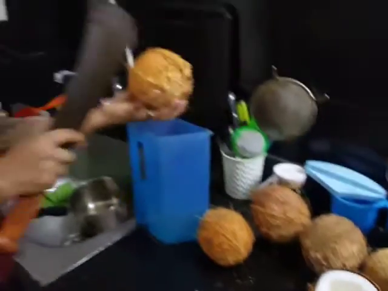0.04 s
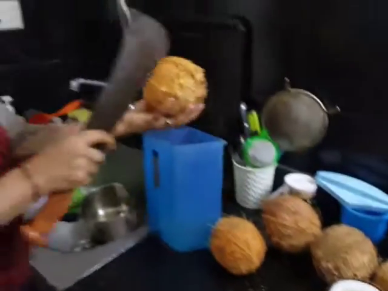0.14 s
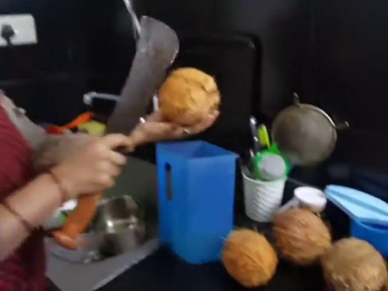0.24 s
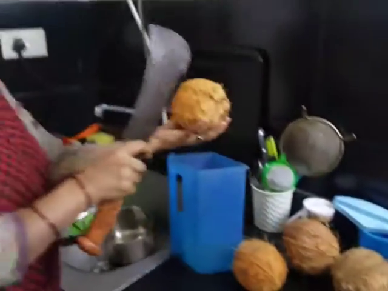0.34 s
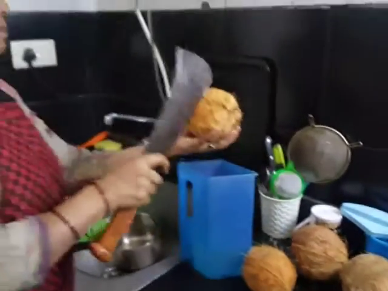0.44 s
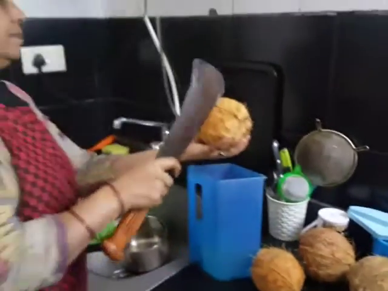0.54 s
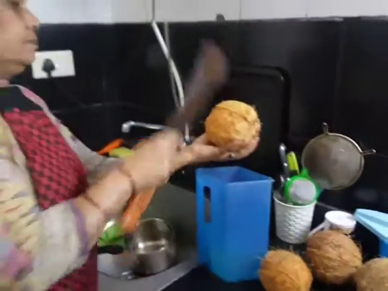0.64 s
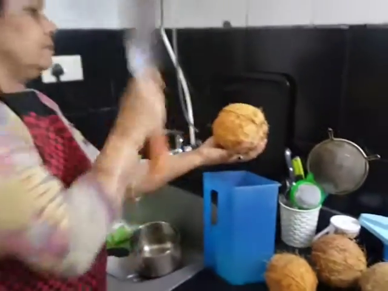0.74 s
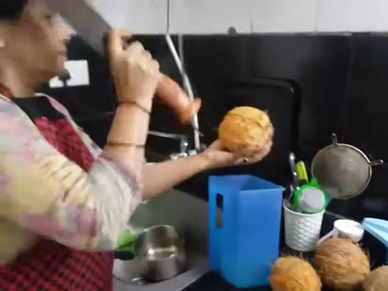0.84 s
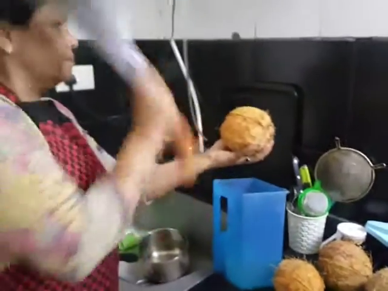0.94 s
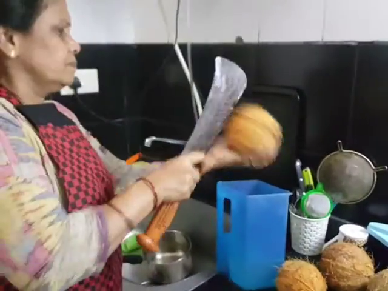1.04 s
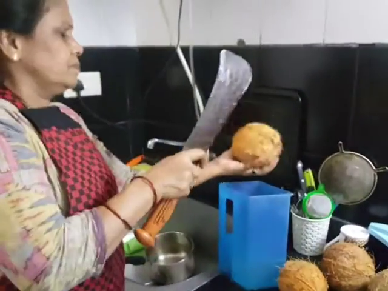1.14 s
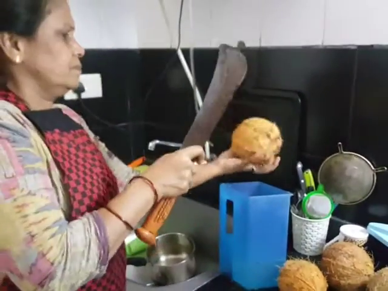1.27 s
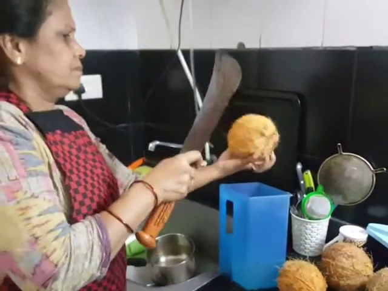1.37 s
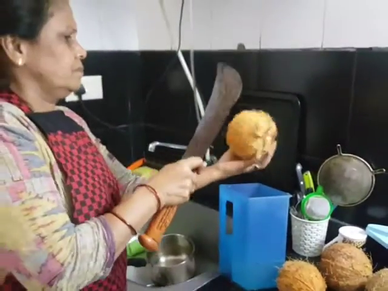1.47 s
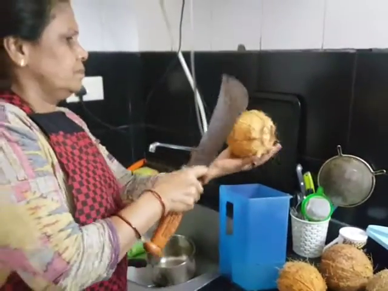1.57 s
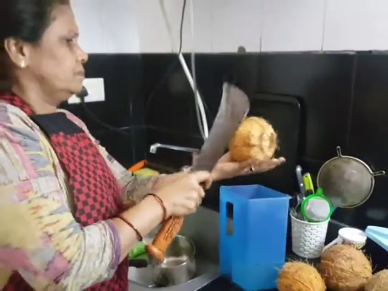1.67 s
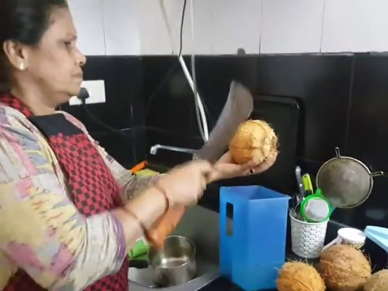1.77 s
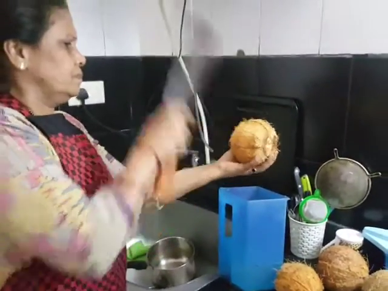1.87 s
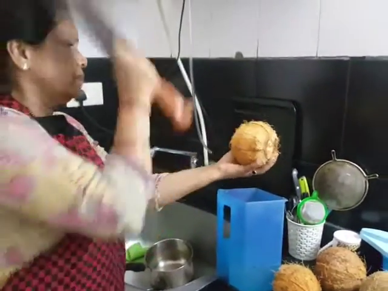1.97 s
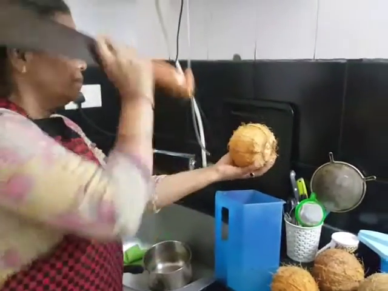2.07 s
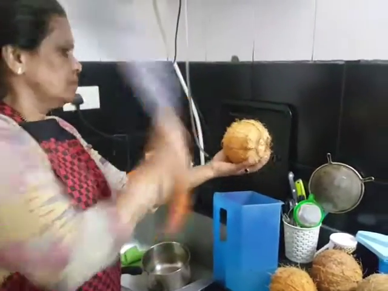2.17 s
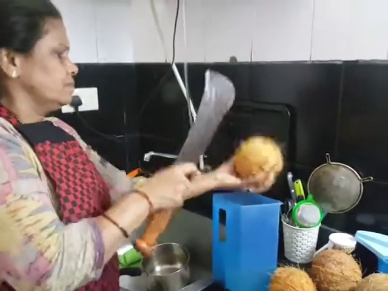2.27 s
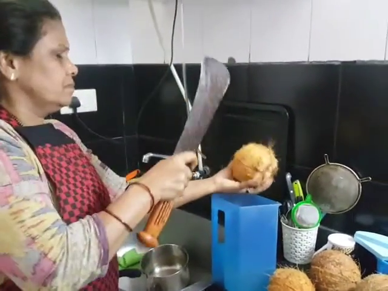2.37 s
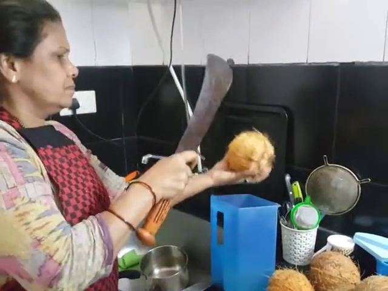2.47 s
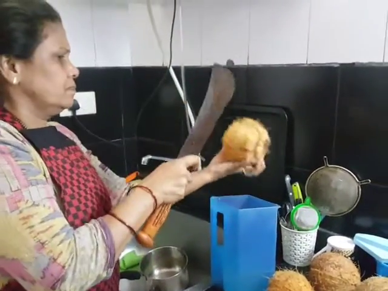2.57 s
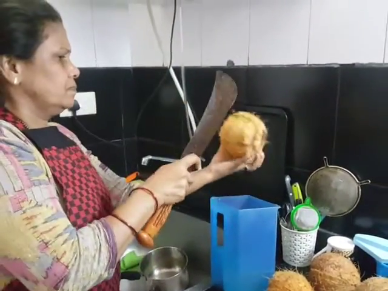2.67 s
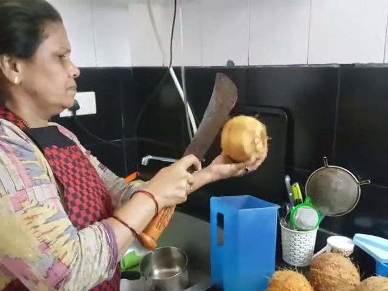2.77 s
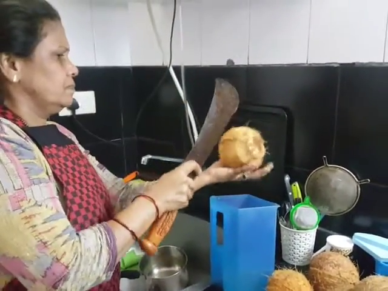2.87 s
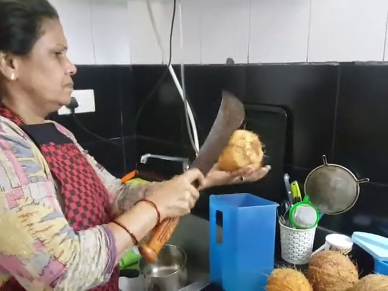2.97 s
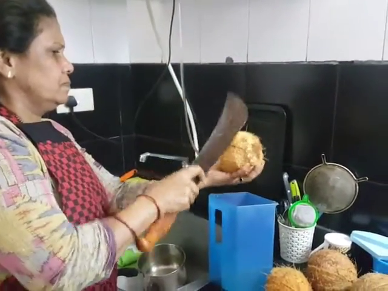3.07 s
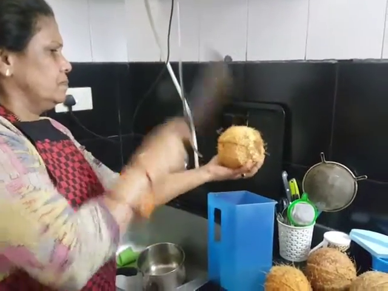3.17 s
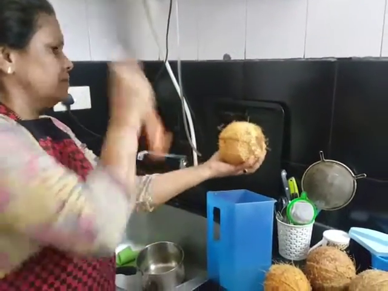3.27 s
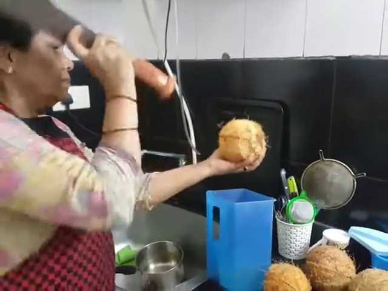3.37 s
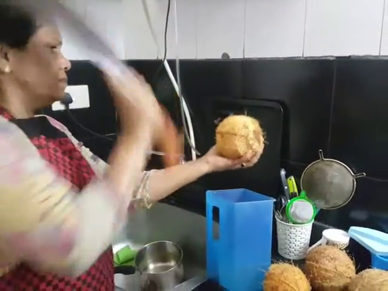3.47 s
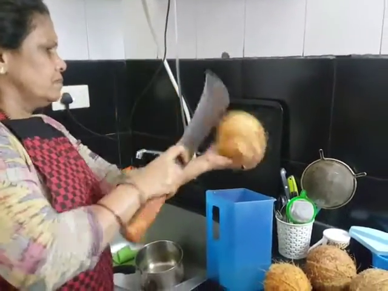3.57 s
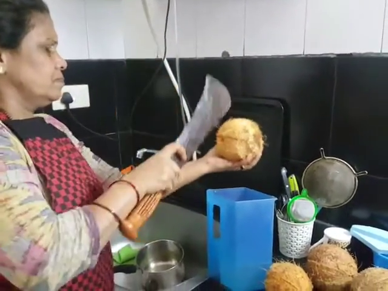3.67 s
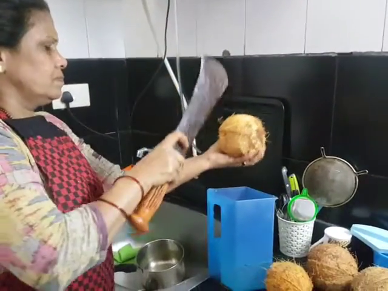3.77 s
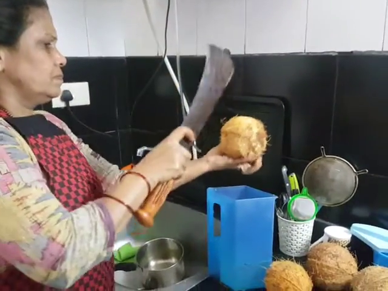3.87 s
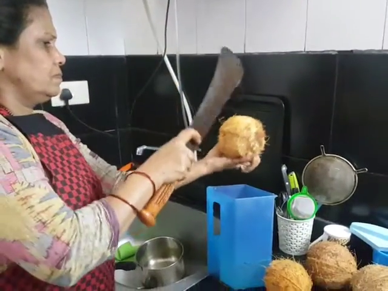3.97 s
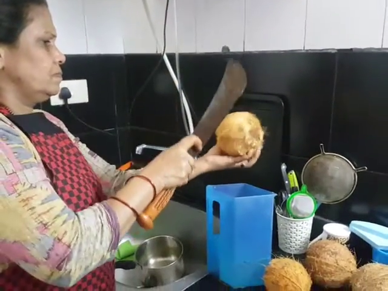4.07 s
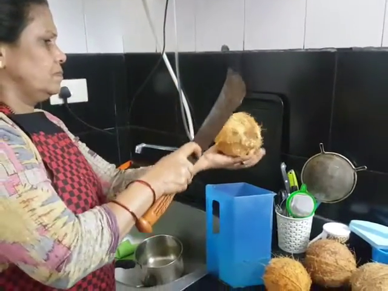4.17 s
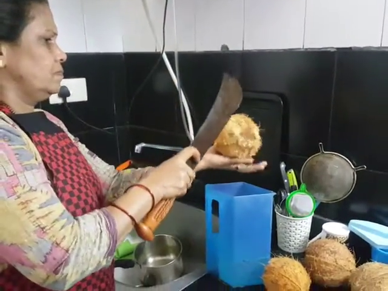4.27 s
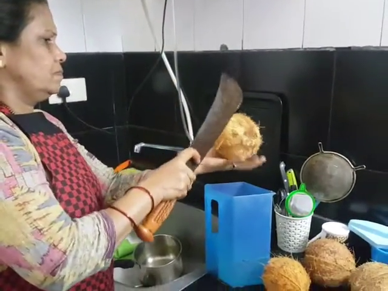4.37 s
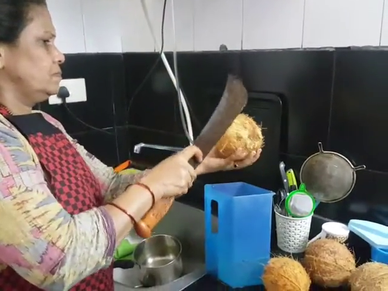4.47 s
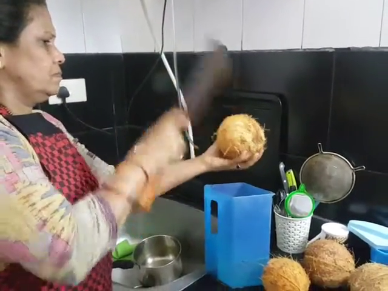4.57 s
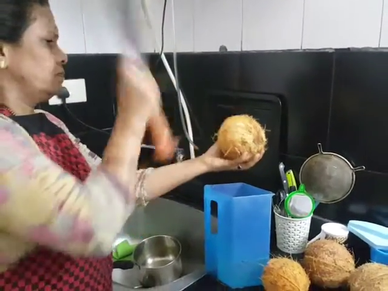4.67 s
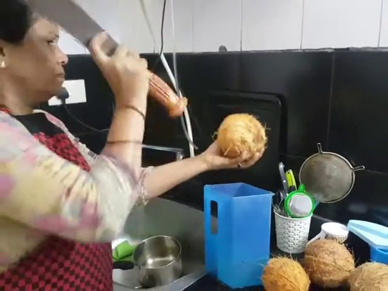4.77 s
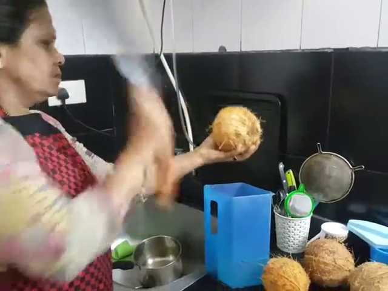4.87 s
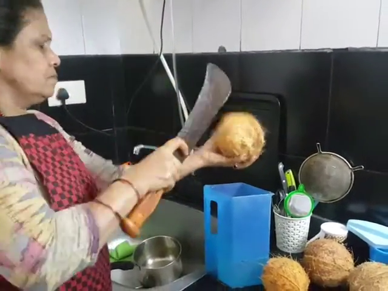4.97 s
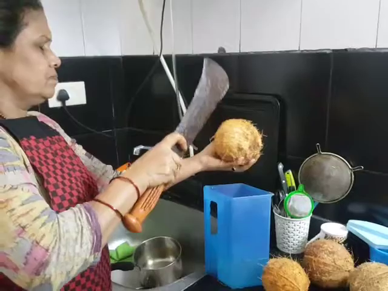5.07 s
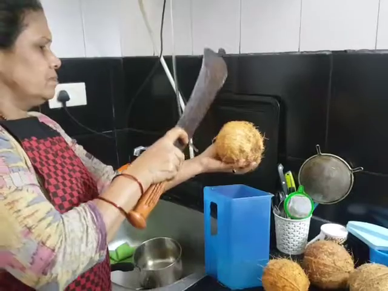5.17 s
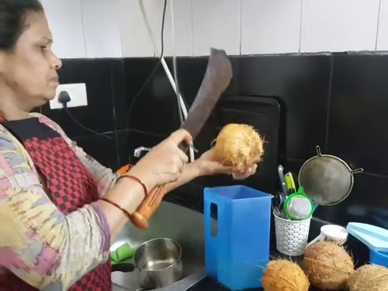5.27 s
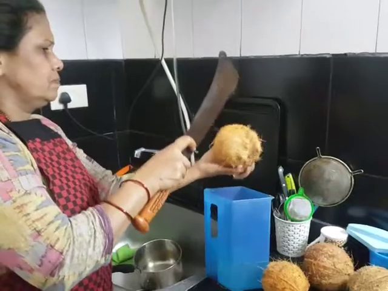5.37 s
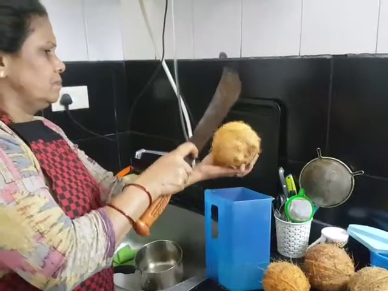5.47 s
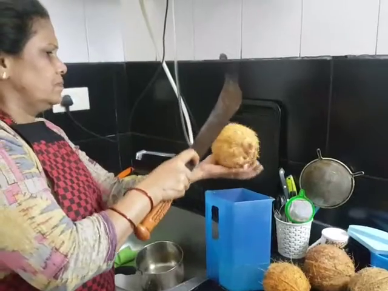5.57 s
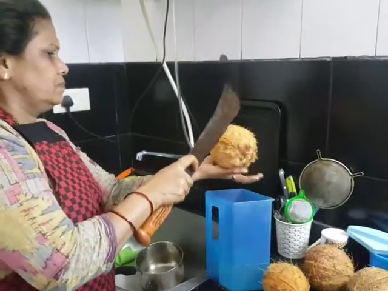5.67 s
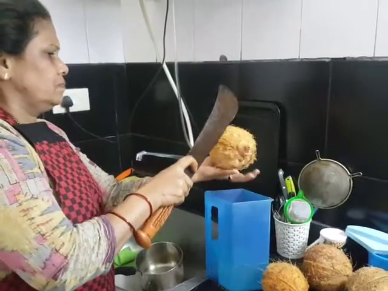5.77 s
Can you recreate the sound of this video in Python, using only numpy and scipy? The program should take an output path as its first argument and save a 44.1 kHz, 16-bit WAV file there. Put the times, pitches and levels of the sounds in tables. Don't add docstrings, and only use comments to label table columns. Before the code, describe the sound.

Four sharp, woody blows of a big knife on a coconut echo off hard kitchen walls, with softer taps between and faint street noise behind.

```python
import sys
import numpy as np
from scipy import signal
from scipy.io import wavfile
from scipy.ndimage import uniform_filter1d

SR = 44100
rng = np.random.default_rng(int(sys.argv[2]) if len(sys.argv) > 2 else 0)


def gain_from_db(level_db):
    decades = np.asarray(level_db, float) / 20
    return 10 ** decades


def to_wav(s):
    ch = np.atleast_2d(s).T
    pcm = np.round(np.clip(ch, -1, 1) * 32767)
    wavfile.write(sys.argv[1], SR, pcm.astype(np.int16))


N = 257544


def evened(x):
    return x / np.sqrt(np.mean(x ** 2) + 1e-20)


def unit(x):
    return x / np.linalg.norm(x)


def read(points, hz):
    f, value = np.transpose(points)
    return np.interp(np.log(hz + 1), np.log(f + 1), value)


def add(mix, s, sound):
    part = mix[:, round(s * SR):][:, :sound.shape[-1]]
    part += sound[..., :part.shape[-1]]


# (frequency [Hz], likeness [-1 to 1])
LIKENESS = [(60, 0.97), (200, 0.89), (380, 0.63), (640, 0.78), (1200, 0), (15000, 0.085)]
# (frequency [Hz], left minus right [dB])
BALANCE = [(60, -1.5), (180, 0), (550, 0.5), (1650, -0.5), (4970, -1.5), (15000, 2.5)]


def stereo_noise(size, shape_db, hop=64):
    frames = size // hop + 5
    hz = np.fft.rfftfreq(4 * hop, 1 / SR)[:, None]
    a, b, c, d = rng.standard_normal((frames, len(hz), 4)).T
    same = np.clip(read(LIKENESS, hz), -1, 1)
    left = a + 1j * b
    right = same * left + np.sqrt(1 - same ** 2) * (c + 1j * d)
    balance_db = read(BALANCE, hz) * np.array([.5, -.5])[:, None, None]
    gain_db = shape_db(hz, np.arange(frames) * hop / SR) + balance_db
    spectra = np.array([left, right]) * gain_from_db(gain_db)
    return signal.istft(spectra, nperseg=4 * hop, noverlap=3 * hop)[1][:, :size]


DUCK_DB = [2, 2, 8.3, 9]


def ducking():
    hold_s, release_s = 0.6, 0.56
    t, down = np.arange(N) / SR, 0
    for blow, depth_db in zip(BLOWS, DUCK_DB):
        hold = np.clip(1 - (t - blow[0] - hold_s) / release_s, 0, 1) * (t > blow[0])
        down = np.maximum(down, depth_db * hold)
    return uniform_filter1d(down, 400)


# (frequency [Hz], level [dB per Hz])
WASH = [(20, -10.5), (70, 4.5), (130, -1), (230, -2.5), (500, -10), (1000, -15), (2000, -16), (4000, -22.5),
        (6500, -30), (9500, -32), (10300, -42.5), (14500, -37.5), (15000, -42.5), (15400, -50),
        (15800, -71.5)]
# (time [s], level over calm [dB])
BUSY = [(0, 15), (.2, 11), (.47, 6.5), (.75, 9), (1.05, 7.5), (1.9, 0.5), (2.2, -0.5), (2.95, 5), (3.3, 2),
        (3.6, 0.5), (4.4, -1.5), (4.8, -2), (5.0, -5), (5.84, -6.5)]
# (calm level [dB], share of bustle [ratio], share of ducking [ratio], share of a car [dB])
WASH_LAYERS = [
    (-65.5, .6, 1, -6.5),
    (-61, 0.96, 0.89, -28.5),
    (-61, 0.21, 0.25, 1),
]
# (time [s], length [s], level [dB])
CARS = [
    (0.038, 0.12, -54.5),
    (0.814, 0.1, -61.5),
    (2.3, 0.057, -61.5),
    (3.305, 0.13, -68),
    (4.676, 0.41, -59),
    (4.932, 0.052, -55.5),
]


def wash():
    t = np.arange(N) / SR
    busy_db, down_db = np.interp(t, *np.transpose(BUSY)), ducking()
    cars = sum(gain_from_db(db) ** 2 * np.exp(-((t - s) / length) ** 2) for s, length, db in CARS)
    ranges = [[(130, -5), (220, -27.0)],
              [(110, -30.5), (180, -7.0), (1000, -7.0), (1700, -20.0)],
              [(600, -15.0), (1100, -2.5)]]
    mix = 0
    for (calm_db, busy_share, duck_share, car_db), part in zip(WASH_LAYERS, ranges):
        grain = rng.standard_normal((513, N // 256 + 5))
        patches = evened(uniform_filter1d(uniform_filter1d(grain, 8, 0), 12, 1))
        layer = stereo_noise(N, lambda hz, s: read(WASH, hz) + read(part, hz) + 0.24 * patches, hop=256)
        level = np.sqrt(gain_from_db(calm_db + busy_share * busy_db) ** 2 + gain_from_db(car_db) ** 2 * cars)
        mix = mix + evened(layer) * level * gain_from_db(-duck_share * down_db)
    return mix


# (start [s], end [s], frequency [Hz], width [Hz], level [dB])
FAR_TONES = [(0, .17, 1850, 240, -52.5), (0.117, 0.177, 74.5, 20, -46.5), (0.163, 0.246, 65, 20, -43.5),
             (0.286, .38, 65, 20, -49.5), (.17, 0.37, 549.7, 8.3, -51), (0.189, 0.303, 1340, 78, -54),
             (0.719, 0.895, 254, 50, -51), (.9, 1.12, 528, 86, -53), (4.307, 4.803, 2110, 110, -61),
             (4.28, 4.884, 1900, 1300, -55.5), (5.802, 5.84, 2230, 23, -65.5)]


def far_tones():
    mix = np.zeros((2, N))
    for start, end, tone_hz, width, db in FAR_TONES:
        size = round((end - start) * SR)
        tone = stereo_noise(size, lambda hz, s: -20 * np.log10(1 + (2 * (hz - tone_hz) / width) ** 2) + 0 * s,
                            hop=512)
        add(mix, start, gain_from_db(db) * evened(tone) * signal.windows.tukey(size, .85))
    return mix


# (frequency [Hz], rms level [dB])
WHINE = [(14826, -90.5), (14928, -75), (14976, -95.5), (15127, -78.5), (15229, -94.5)]


def whine():
    start_db, sag_db_per_s, duck_share = 3.5, 0.6, 1.05
    t = np.arange(N) / SR
    level_db = start_db - sag_db_per_s * t - duck_share * ducking()
    wavers = evened(uniform_filter1d(rng.standard_normal((len(WHINE), 2, N)), 2500))
    mix = 0
    for (hz, db), waver in zip(WHINE, wavers):
        line = np.sin(2 * np.pi * (hz * t + rng.random((2, 1))))
        mix = mix + np.sqrt(2) * gain_from_db(db + level_db + 2.5 * waver) * line
    return mix


# (time [s], length [s], level [dB])
RUSTLES = [
    (.058, 0.022, -52),
    (0.281, 0.047, -68.5),
    (0.356, 0.048, -75.5),
    (2.13, 0.038, -66.5),
    (2.926, 0.028, -66.5),
    (4.88, 0.0087, -71.5),
]


def rustles():
    colour = [(1000, -22.0), (3000, -6), (9500, -5.5), (10300, -16.5)]  # (Hz, dB)
    mix = np.zeros((2, N))
    for s, length, db in RUSTLES:
        size = round(length * SR)
        brush = stereo_noise(size, lambda hz, t: read(colour, hz) + 0 * t)
        add(mix, s, gain_from_db(db) * evened(brush) * np.hanning(size))
    return mix


def causal(gain_db):
    spectrum = np.exp(np.conj(signal.hilbert(np.log(gain_from_db(gain_db)))))
    return np.fft.ifft(spectrum).real[:len(gain_db) // 2]


def knock(ring_db, dull_hz, shell, colour, size=8192):
    hz = abs(np.fft.fftfreq(size, 1 / SR))
    modes = sum(gain_from_db(db + ring_db) ** 2 / (1 + (2 * (hz - mode_hz) / width) ** 2) ** 2
                for mode_hz, width, db in shell)
    power = (gain_from_db(read(colour, hz)) ** 2 + modes) / (1 + (hz / dull_hz) ** 2)
    return unit(causal(10 * np.log10(power)))


def direct(sound):
    snaps = rng.standard_normal((2, 90)) * np.exp(-np.arange(90) / 20) * gain_from_db(-7)
    snaps[:, 0] = 1
    snaps[1] = np.roll(snaps[1], 9)
    push_hz, fibre_share = 2500, 0.3
    blunt = signal.lfilter(*signal.butter(2, push_hz, fs=SR), sound)
    path = blunt + fibre_share * (sound - blunt)
    return signal.fftconvolve(path[None], unit(snaps) * np.sqrt(2), axes=1)


# (frequency [Hz], t60 [s])
WALLS = [(100, 0.26), (260, 1), (700, 0.67), (1840, 0.6), (3500, 0.63), (5500, 0.56), (8500, 0.49),
         (11500, 0.39), (15000, 0.3)]


def diffuse_tail(rise_ms=0.18):
    early_db, early_t60 = 4, 0.091
    tail = stereo_noise(SR, lambda hz, s: -60 * s / read(WALLS, hz))
    t = np.arange(SR) / SR
    early = np.sqrt(1 + gain_from_db(early_db - 60 * t / early_t60) ** 2)
    return unit(tail * early * (1 - np.exp(-t * 1000 / rise_ms))) * np.sqrt(2)


# (frequency [Hz], level [dB], t60 [s], build-up [ms], sign)
STANDING = [(72, -23, .9, 15, 1), (104, -22, .8, 15, -1), (173.5, -7, .66, 18, -1), (201, -4, .7, 18, 1),
            (245, 0, .45, 18, 1), (263, -6, .45, 18, 1), (297, -8, .5, 10, -1), (311, -11, .55, 10, 1),
            (350, -8, .6, 8, -1), (431, -15, .55, 8, 1), (496, -13, .6, 8, -1), (647, -11, .5, 6, 1),
            (700, -14, .5, 6, -1)]


def standing_waves(jolt_db):
    t = np.arange(2 * SR) / SR
    room = 0
    for hz, db, t60, rise_ms, sign in STANDING:
        swell = (1 - np.exp(-t * 1000 / rise_ms)) ** 2
        room = room + sign * gain_from_db(db - 60 * t / t60) * swell * np.sin(2 * np.pi * hz * t)
    jolt_hz, jolt_t60 = 255, 0.054
    jolt = gain_from_db(-60 * t / jolt_t60) * np.sin(2 * np.pi * jolt_hz * t) * (1 - np.exp(-t / 0.0022))
    return unit(room) + gain_from_db(jolt_db) * unit(jolt)


def strike(mix, s, sound, lows, thud_db, direct_db):
    add(mix, s, gain_from_db(direct_db) * direct(sound))
    add(mix, s + .0005, signal.fftconvolve(sound[None], diffuse_tail(), axes=1))
    add(mix, s, gain_from_db(thud_db) * lows)


# (time [s], crack [dB], thud in standing waves [dB], direct share [dB], dull above [Hz])
TAPS = [
    (0.4859, -3, -6, 3.5, 800),
    (1.668, -13.5, -10, -1.5, 2500),
    (3.034, -14, -9.5, -1, 1600),
    (4.298, -31.5, -21.5, -3.5, 159.8),
    (5.753, -25, -19.5, -9, 152),
]
# (frequency [Hz], width [Hz], level [dB])
TAP_SHELL = [(255, 100, -1.5), (510, 130, 1.5), (810, 260, -9.5), (1040, 200, -5.5), (1690, 180, 6),
             (2390, 120, -8.5), (3020, 110, -25.5), (8370, 700, -4)]
# (frequency [Hz], level [dB per Hz])
CRACK = [(30, -56), (130, -4.5), (250, -1), (800, 0), (1150, -8.5), (2500, -4.5), (4200, -9.5),
         (6300, -12.5), (8600, -8.5), (10300, -16), (15300, -17.5), (15900, -52.5)]


def taps():
    mix, lows = np.zeros((2, N)), standing_waves(jolt_db=-2)
    for s, crack_db, thud_db, direct_db, dull_hz in TAPS:
        sound = gain_from_db(crack_db) * knock(0.5, dull_hz, TAP_SHELL, CRACK)
        strike(mix, s, sound, lows, thud_db, direct_db)
    return mix


# (time [s], crack [dB], thud in standing waves [dB], shell ring over crack [dB], direct share [dB])
BLOWS = [
    (1.111, 21.5, 14, 4.5, -16),
    (2.309, 21.5, 17, 0.5, -16.5),
    (3.6399, 22.5, 9.5, -1, -6),
    (5.0163, 22.5, 9.5, 1, -2.5),
]
# (frequency [Hz], width [Hz], level [dB])
SHELLS = [
    [(830, 170, -18.5), (1630, 170, 5), (2230, 130, -2), (2938, 120, -0.5), (3590, 140, -5),
     (8350, 1900, -9.5)],
    [(638, 27, 3), (770, 520, 1), (1680, 70, 8), (1835, 200, 3), (2800, 230, -3.5), (2990, 830, 3),
     (3540, 67, -25.5), (4940, 930, -7.5)],
    [(776, 110, 3), (1170, 330, -3), (1900, 110, -16), (2060, 330, 1.5), (2800, 150, 4), (2950, 170, -0.5),
     (3800, 280, -10)],
    [(862, 170, -2), (1380, 400, -2.5), (1807, 120, 3.5), (2236, 220, 0), (2640, 220, -6), (4550, 1700, -9),
     (9100, 370, -7.5)],
]
# (frequency [Hz], level [dB per Hz])
SPLIT = [(30, -38.5), (130, -18), (250, -9.5), (800, -3.5), (1150, -3.5), (2500, 1.5), (4200, -6),
         (6300, -13.5), (8600, -8.5), (10300, -19), (15300, -17), (15900, -57.5)]


def blows():
    mix, lows = np.zeros((2, N)), standing_waves(jolt_db=-7.5)
    for blow, shell, colour in zip(BLOWS, SHELLS, [CRACK, CRACK, SPLIT, SPLIT]):
        s, crack_db, thud_db, ring_db, direct_db = blow
        sound = gain_from_db(crack_db) * knock(ring_db, 12000, shell, colour)
        strike(mix, s, sound, lows, thud_db, direct_db)
        add(mix, s, gain_from_db(crack_db + direct_db) * slap())
        add(mix, s, sink())
    add(mix, BLOWS[-1][0], hollow())
    return mix


def slap():
    hz, db, t60 = 1400, -6, 0.006
    t = np.arange(SR // 50) / SR
    return gain_from_db(db) * unit(-gain_from_db(-60 * t / t60) * np.sin(2 * np.pi * hz * t))


def sink():
    hz, db, t60, beat_s = 250, -29, 1.5, 0.37
    t = np.arange(2 * SR) / SR
    return gain_from_db(db - 60 * t / t60) * np.sin(np.pi * t / beat_s) ** 2 * np.sin(2 * np.pi * hz * t)


# (frequency [Hz], level [dB], t60 [s])
BANGLE = [(2800, -10.5, .02), (3240, -3, .03), (3600, -2.5, .015), (4200, -5, .012), (5140, -6, .035),
          (9110, -8.5, .03)]
# (time [s], level [dB])
CLINKS = [
    (3.208, -47.5),
    (3.269, -73),
]


def bangle():
    mix, t = np.zeros((2, N)), np.arange(SR // 2) / SR
    ring = sum(gain_from_db(db - 60 * t / t60) * np.sin(2 * np.pi * hz * t) for hz, db, t60 in BANGLE)
    for s, db in CLINKS:
        walls = signal.fftconvolve(ring[None], diffuse_tail(), axes=1)[:, :len(t)]
        add(mix, s, gain_from_db(db) * (ring + gain_from_db(8.5) * walls))
    return mix


def hollow():
    hz, db, t60, rise_s = 246, -10, 0.3, 0.004
    t = np.arange(SR // 2) / SR
    return gain_from_db(db - 60 * t / t60) * (1 - np.exp(-t / rise_s)) * np.sin(2 * np.pi * hz * t)


def scene():
    no_deep_bass = signal.butter(3, 55, "high", fs=SR, output="sos")
    hits = signal.sosfilt(no_deep_bass, taps() + blows())
    return wash() + far_tones() + whine() + rustles() + hits + bangle()


def low_pass(x):
    return signal.sosfilt(signal.butter(12, 16500, fs=SR, output="sos"), x)


def record(dry):
    power_db = 10 * np.log10(abs(uniform_filter1d((dry ** 2).mean(0), 200)) + 1e-12)
    fall_db = np.arange(N) * 7.6 / SR
    peak_db = np.maximum.accumulate(power_db + fall_db) - fall_db
    over_db = np.maximum(peak_db + 19.5, 0)
    held = dry / gain_from_db(0.083 * uniform_filter1d(over_db, 100))
    thin = signal.sosfilt(signal.butter(2, 28, "high", fs=SR, output="sos"), held)
    clipped = np.clip(thin, -.88, .88)
    mix = signal.sosfiltfilt(signal.butter(10, 15900, fs=SR, output="sos"), clipped)
    return low_pass(mix)


dry = scene()
out = record(dry)
to_wav(out)
```